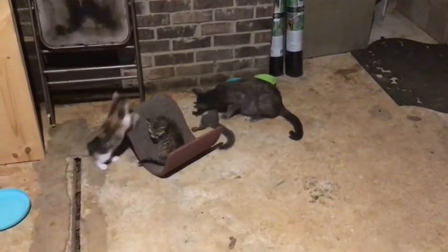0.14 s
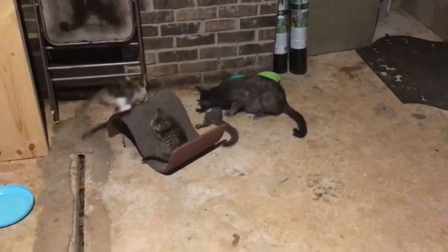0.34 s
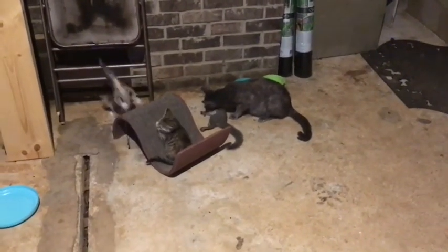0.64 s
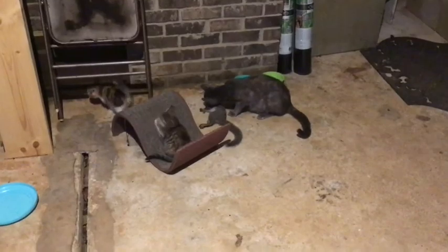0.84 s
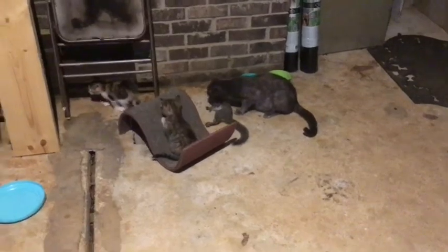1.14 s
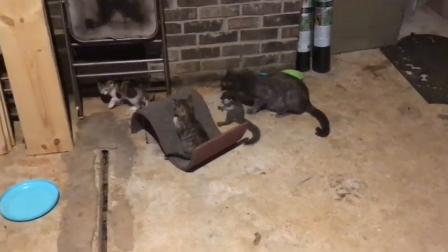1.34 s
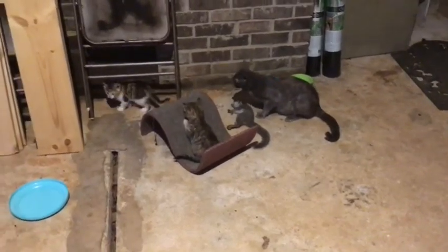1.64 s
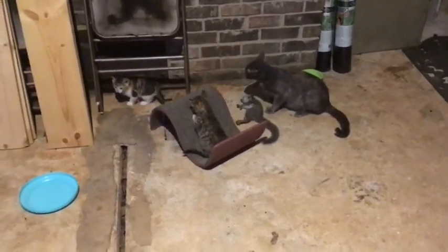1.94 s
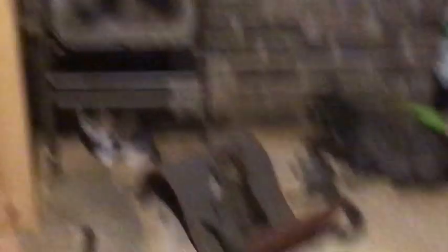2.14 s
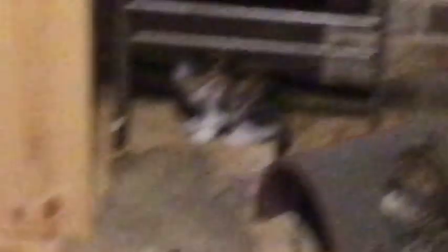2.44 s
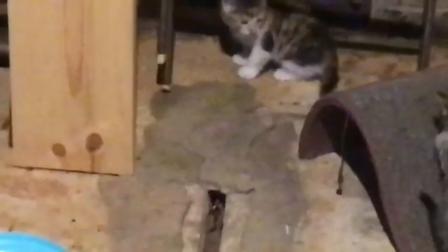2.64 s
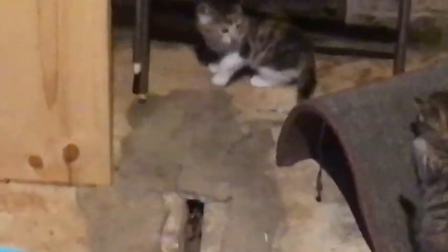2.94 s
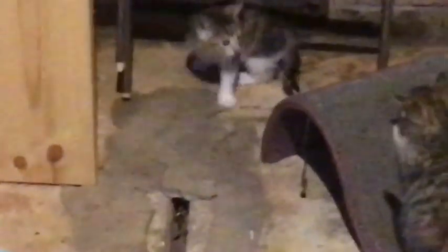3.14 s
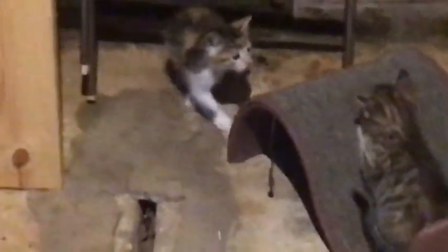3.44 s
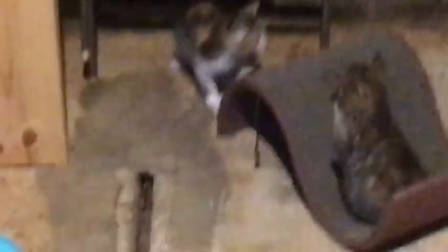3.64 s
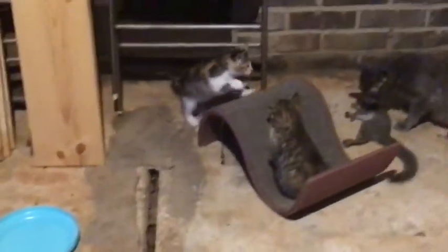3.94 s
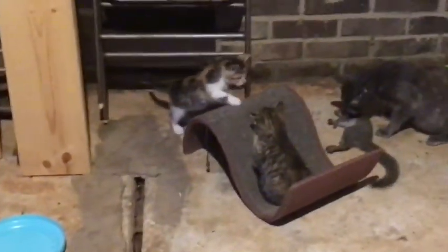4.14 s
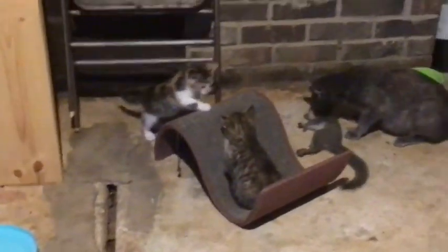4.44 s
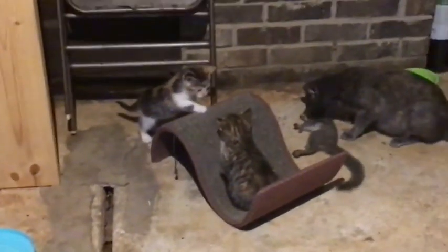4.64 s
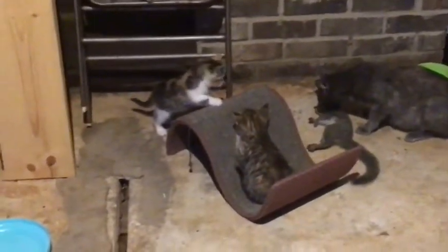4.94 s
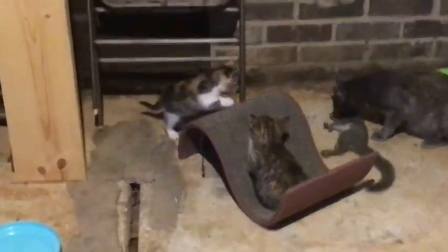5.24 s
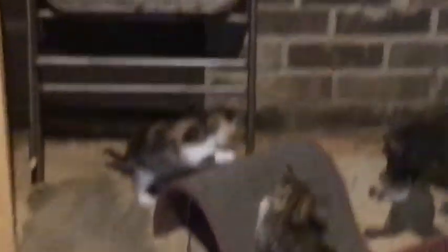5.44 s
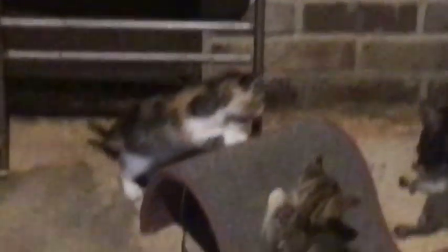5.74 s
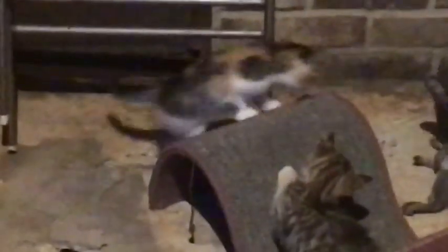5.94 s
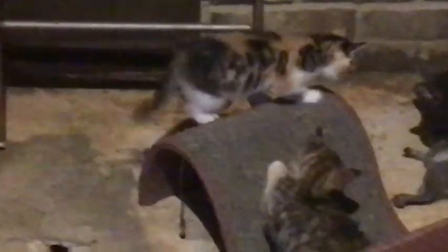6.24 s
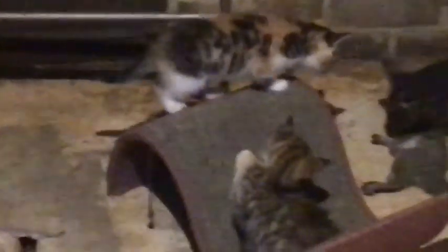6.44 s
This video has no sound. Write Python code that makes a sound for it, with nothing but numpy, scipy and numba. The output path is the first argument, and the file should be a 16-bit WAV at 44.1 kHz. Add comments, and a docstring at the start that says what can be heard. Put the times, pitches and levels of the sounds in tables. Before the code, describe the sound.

Faint kitten scuffles under a dense cricket chorus. At first the insects are distant and thin lens ticks flicker above uneven hand rumble. A deep double thump and rough finger rub dominate near two seconds. The chorus then swells and becomes more tonal, joined by single insect trills, small clicks and dry claw scratches. A duller handling knock follows around three and a half seconds, and lighter taps and scuffs close it.

```python
"""A porch at night: many crickets hiss together, louder while the phone's pickup narrows on two kittens.
Around the scratcher, claw scuffs, clicks and soft low taps are short noise bursts, some narrow and pitched.
Fingers tap and drag on the phone, the hand rumbles and creaks, the lens motor ticks: pushes, noise, pulses.
Air and a patchy rustle are coloured noise; small chirps are gliding tones, trills are narrow pulsing noise."""
import sys
import numpy as np
from scipy import signal
from scipy.fft import rfft, irfft, next_fast_len
from scipy.io import wavfile
from scipy.ndimage import uniform_filter1d
from numba import njit

SR = 44100
rng = np.random.default_rng(int(sys.argv[2]) if len(sys.argv) > 2 else 0)


def store_wav(level_fs):
    """Save 16-bit WAV to argv[1]."""
    pcm = np.round(np.clip(np.atleast_2d(level_fs), -1, 1) * 32767)
    wavfile.write(sys.argv[1], SR, pcm.T.astype(np.int16))


N = 290619  # length in samples


def undb(db):
    """Gain of a level in dB."""
    return 10 ** (np.asarray(db) / 20)


def curve(rows):
    """Columns of a time table joined by straight lines, one value a sample."""
    s, *columns = np.transpose(rows)
    return [np.interp(np.arange(N) / SR, s, column) for column in columns]


def shaped(x, points):
    """Colour x by a table of (f/Hz, level/dB) points, then set its rms to 1."""
    hz, db = np.transpose(points)
    size = next_fast_len(len(x))
    f = np.fft.rfftfreq(size, 1 / SR) + 1e-3  # keeps the logarithm finite at 0 Hz
    gain = undb(np.interp(np.log(f), np.log(hz), db, left=-90, right=-90))
    y = irfft(rfft(x, size) * gain, size)[:len(x)]
    return y / np.std(y)


@njit
def svf(x, hz, width):
    """State-variable band-pass with a moving centre, gain 1 at the centre."""
    y, band, low = np.empty(len(x)), 0., 0.
    for i in range(len(x)):
        g, k = np.tan(np.pi * hz[i] / SR), width / hz[i]
        v = (band + g * (x[i] - low)) / (1 + g * (g + k))
        band, low, y[i] = 2 * v - band, low + 2 * g * v, k * v
    return y


def narrow(x, hz, width):
    """A resonance applied twice, rms 1; its centre may move."""
    centre = hz * np.ones(len(x))
    # each pass is wider, so that the two together come close to width
    once = svf(x, centre, 1.5 * width)
    y = svf(once, centre, 1.5 * width)
    return y / np.std(y)


def walk(rate):
    """Random levels held 1 / rate s and smoothed twice; spread 1."""
    hold = int(SR / rate)
    steps = np.repeat(rng.standard_normal(N // hold + 1), hold)
    w = uniform_filter1d(uniform_filter1d(steps, hold), hold)[:N]
    return w / np.std(w)


def grainy(db, rate):
    """Noise whose level flickers by db, rate times a second."""
    return rng.standard_normal(N) * undb(db * walk(rate))


def add(out, s, x):
    """Mix x into out from time s."""
    i = int(s * SR)
    out[i:i + len(x)] += x[:N - i]


# colour of the quiet air: (f/Hz, relative level/dB per Hz)
AIR_COLOUR = [(500, -38.5), (800, -8), (1300, -8), (2400, -5), (5000, -14.5), (6600, -13), (7900, -17),
              (9800, -14.5), (11500, -22.5), (15900, -20.5)]


def quiet_air(level_db=-71):
    """A faint, nearly steady hiss of coloured noise."""
    return shaped(grainy(0.29, 34), AIR_COLOUR) * undb(level_db)


# cricket chorus over time: (t/s, level/dB, centre of its strongest part f/Hz)
CHORUS_PATH = [(0, -67.5, 3900), (1.95, -68, 3930), (2.25, -61.5, 3200), (2.6, -59.5, 4020),
               (3.0, -59, 4750), (3.5, -58, 4420), (5.0, -56.5, 4180), (5.45, -62, 4180), (6.59, -62, 4220)]
# colour of the whole chorus: (f/Hz, relative level/dB per Hz)
CHORUS_COLOUR = [(2500, -12.5), (3050, -2.5), (3400, 2), (4800, 1.5), (5100, -3.5), (5350, -14),
                 (6000, -45)]


def crickets():
    """So many singers that their pulses merge into a hiss; the narrowed pickup lifts its strongest part."""
    db, hz = curve(CHORUS_PATH)
    wide = shaped(grainy(1.73, 40), CHORUS_COLOUR)
    focus = np.clip((db + 71) / 8, 0, 1)  # the louder the chorus, the narrower the pickup
    focused = 0.28 * wide + 1.485 * svf(wide, hz, 844.0)
    chorus = (1 - focus) * wide + focus * focused
    # a few nearer singers stand out for a moment each
    for near_hz in np.linspace(3700, 4850, num=5):
        chorus = chorus + undb(-19) * narrow(grainy(5.0, 14), near_hz, 120)
    return chorus * undb(db + .6 * walk(5))


# grip on the phone: (t/s, rumble level/dB, level/dB of the creak of skin on the case)
GRIP_PATH = [(0, -60, -67.5), (.75, -61.5, -70.5), (1.3, -61.5, -70.5), (1.9, -52.5, -67),
             (2.4, -61.5, -67), (2.7, -60.5, -69.5), (3.5, -55.5, -67.5), (3.95, -67.5, -72.5),
             (5.05, -60, -67.5), (5.5, -55.5, -65.5), (5.75, -55, -70.5), (6.1, -57.5, -68.5),
             (6.59, -59, -73)]
# the hand shifts its hold: (t/s of the peak, rumble level/dB, half length t/s)
HOLD_SHIFTS = [(.92, -59, 0.11), (1.109, -58, 0.053), (1.42, -55, 0.062), (1.674, -61, 0.074),
               (2.854, -51, 0.13), (3.278, -64, 0.025), (4.303, -74.5, 0.47), (5.198, -53.5, 0.023),
               (5.458, -49.5, 0.014), (6.3, -52.5, 0.047)]
# colour of the low rumble, also used for the thud of a drag: (f/Hz, relative level/dB per Hz)
RUMBLE_COLOUR = [(28, -61), (45, -9), (65, 4.5), (140, -0.5), (250, -10.5), (400, -31)]


def hand():
    """The grip shakes the case in uneven low swells; skin creaks above them."""
    t = np.arange(N) / SR
    rumble_gain, creak_gain = undb(curve(GRIP_PATH))
    for s, db, half in HOLD_SHIFTS:
        rumble_gain = rumble_gain + undb(db) * np.clip(1 - ((t - s) / half) ** 2, 0, 1)
    rumble = shaped(grainy(3.6, 17), RUMBLE_COLOUR)
    creak = shaped(grainy(3.45, 60), [(180, -7.0), (300, -1.0), (650, -5.0), (900, -17.0), (1400, -38)])
    return rumble * rumble_gain + creak * creak_gain


# airy rustle, perhaps fur on carpet; the first level also holds before its time: (t/s, level/dB)
RUSTLE_PATH = [(2.36, -80), (2.48, -71), (2.6, -80), (2.74, -78.5), (2.78, -66.5), (2.95, -74), (3.04, -89),
               (3.08, -69), (3.25, -77), (3.33, -93.5), (4.5, -101), (4.58, -76), (4.68, -78), (4.78, -73),
               (4.9, -68), (5.0, -92), (5.1, -99)]


def rustle(centre_hz=5880, width_hz=1500):
    """A patchy high rustle: flickering noise through two resonances whose centre wanders."""
    hz = centre_hz * (1 + .05 * walk(12))
    once = svf(grainy(4.5, 50), hz, 1. * width_hz)
    x = svf(once, hz, 1. * width_hz)
    return x / np.std(x) * undb(curve(RUSTLE_PATH)[0])


# how likely each tick is, repeated in this order: one column, chance from 0 to 1 [no unit]
STEP_CHANCE = [.6, .1, 1, .1, 1, .9]


def lens(rate=60, start_s=.0137, zoom_s=2.0, before_db=-50, zoomed_db=-67):
    """Motor steps make thin ticks on the picture clock; some pictures need no step."""
    count = int(N / SR * rate) - 1
    luck = rng.random((count, 3))
    jitter = 0.0015 * (luck[:, 0] - .5)
    s = start_s + np.arange(count) / rate + jitter
    happens = luck[:, 1] < np.resize(STEP_CHANCE, count)
    steps = np.zeros(N)
    steps[(s * SR).astype(int)] = happens * undb(2.0 * luck[:, 2])
    tick = svf(steps, np.full(N, 9600.), 2200.) + .8 * svf(steps, np.full(N, 13500.), 4000.)
    level_db = np.where(np.arange(N) < zoom_s * SR, before_db, zoomed_db)
    return tick / np.max(np.abs(tick)) * undb(level_db)


# claw scuffs, clicks and a few soft low taps: (t/s, level/dB, centre f/Hz, time to fall by 60 dB t/s)
SHORT_BURSTS = [(0.094, -59, 1000, 0.24), (0.249, -55.5, 328, 0.32), (0.409, -55, 474, 0.38),
                (1.01, -62.5, 935, 0.42), (2.218, -49.5, 2420, 0.062), (2.324, -58, 8900, 0.018),
                (2.334, -61, 8340, 0.086), (2.346, -52, 298, 0.11), (2.427, -49.5, 418, 0.09),
                (3.497, -48.5, 487, 0.14), (3.264, -63, 7000, 0.045), (3.402, -55.5, 6600, 0.33),
                (4.65, -55.5, 2550, 0.55), (4.798, -55.5, 5460, 0.23), (5.051, -60.5, 1090, 0.28),
                (5.1, -59.5, 2300, 0.59), (5.29, -60, 7240, 0.043), (5.311, -57, 6860, 0.059),
                (5.352, -52.5, 9100, 0.03), (5.483, -61, 9700, 0.1), (5.965, -53.5, 5800, 0.28),
                (5.97, -56, 12500, 0.29), (6.41, -67, 9000, 0.14)]
# narrow pitched scuffs, the low ones near 5.8 s perhaps a faint kitten trill: (t/s, level/dB, centre f/Hz)
NARROW_SCUFFS = [(4.648, -54, 2270), (4.805, -54.5, 2200), (4.882, -56, 3000), (5.19, -60, 1830),
                 (5.802, -57, 780), (5.814, -55.5, 1200), (5.858, -57.5, 920)]


def scuffs(attack_share=0.017):
    """Short noise bursts, wide or narrow and pitched, start quickly and die away in the porch."""
    out, grain = np.zeros(N), grainy(2.5, 70)
    slide = 1 + .025 * walk(30)  # the pitch wavers
    # widths are shares of the centre frequency
    wide = [(s, db, hz, 0.83 * hz, t60) for s, db, hz, t60 in SHORT_BURSTS]
    pitched = [(s, db, hz, 0.15 * hz, 0.33) for s, db, hz in NARROW_SCUFFS]
    for s, db, hz, width, t60 in wide + pitched:
        part = slice(int(s * SR), int((s + t60) * SR))
        x = narrow(grain[part], hz * slide[part], width)
        t = np.arange(len(x)) / SR
        attack = 1 - np.exp(-t / (attack_share * t60))
        decay = undb(-60 * t / t60)
        add(out, s, undb(db) * x * attack * decay)
    return out


# finger taps on the phone, some sharp, some deep and dull:
# (t/s, click peak level/dB, thud peak level/dB, thud f/Hz)
FINGER_TAPS = [(0.409, -56, -48.5, 450), (1.089, -76, -49.5, 345), (1.513, -39, -36, 403),
               (1.909, -63, -45.5, 293), (1.984, -27.5, -29, 870), (1.988, -45, -6.5, 185),
               (2.057, -50, -12.5, 115), (2.498, -54.5, -47, 356), (2.543, -66, -55, 302),
               (2.805, -53, -60.5, 400), (2.826, -43, -45, 347), (2.762, -75, -32.5, 440),
               (2.907, -54, -25, 205), (3.597, -44, -28, 600), (5.289, -62.5, -64, 202),
               (5.354, -45, -36.5, 700), (5.381, -45, -34, 636), (5.425, -65, -47.5, 260),
               (6.01, -85, -49.5, 377), (6.149, -85, -45.5, 258)]


def taps(turns=1.75, click_hz=1800, case_hz=52, steepness=2.8, rattle_db=-12, rattle_t60_s=.08):
    """A short push heard through the case: the treble arrives first, each octave down twice as late."""
    out, size = np.zeros(N), 8192
    f = np.fft.rfftfreq(size, 1 / SR) + 1
    delay = np.exp(-2j * np.pi * turns * np.log(np.minimum(f / 3020.0, 1)))
    late = delay / (1 + (case_hz / f) ** 6)  # the case passes little below case_hz
    click = irfft(late * f / (f + 950.0) / (1 + (f / click_hz) ** 2) ** 2, size)
    click = click / np.max(np.abs(click))
    for s, click_db, thud_db, hz in FINGER_TAPS:
        # a fingertip is soft: little above the pitch of its contact
        thud = irfft(late * (f / hz) ** 0.96 / (1 + (f / hz) ** 2) ** steepness, size)
        thud = thud / np.max(np.abs(thud))
        add(out, s, undb(click_db) * click + undb(thud_db) * thud)
    # rough tail of the case after each push
    t = np.arange(size) / SR
    rattle = rng.standard_normal(size) * undb(-60 * t / rattle_t60_s)
    tail = signal.fftconvolve(out, rattle / np.linalg.norm(rattle))[:N]
    return out + undb(rattle_db) * tail


# a finger drags over the case: (t/s, hold t/s, rub level/dB, thud level/dB,
# rub rise/dB per s, rub fall/dB per s, treble gain/dB)
FINGER_DRAGS = [(2.042, 0.011, -32.5, -26.5, 496, 256, -1.5), (2.103, 0.023, -30.5, -37.5, 301.5, 207, -10),
                (3.594, .024, -37.5, -44, 650, 1000, -2), (5.297, 0.0053, -62.5, -44, 297, 400, -6),
                (5.357, 0.013, -54.5, -45.5, 300, 309, 0.1)]
# colour of the rough middle: (f/Hz, relative level/dB per Hz)
RUB_COLOUR = [(150, -43), (220, -7.5), (540, -3), (800, -12), (1300, -28.5), (2000, -51)]
# colour of the hiss before the treble gain: (f/Hz, relative level/dB per Hz)
HISS_COLOUR = [(600, -30), (900, 0.5), (1900, 1), (3640, -2), (4900, -8), (7100, -17.5), (8390, -13),
               (11300, -21.5), (15900, -27)]


def drags(hiss_at_db=-39.5, hiss_follows=0.51, thud_lingers=0.62):
    """Skin sticks and slips: lumpy lows, a rough middle, a dense hiss on top."""
    thud = shaped(grainy(2.0, 40), RUMBLE_COLOUR)
    rub = shaped(grainy(2.2, 120), RUB_COLOUR)
    hiss = shaped(grainy(1.2, 90), HISS_COLOUR)
    treble = svf(hiss, np.full(N, 9500.), 10000.)
    out, t = 0, np.arange(N) / SR
    for s, hold, rub_db, thud_db, rise, fall, treble_db in FINGER_DRAGS:
        ease_db = -np.maximum(0, np.maximum(rise * (s - t), fall * (t - s - hold)))
        # hiss_at_db belongs to a rub of -31 dB; a louder rub hisses louder
        hiss_db = hiss_at_db + hiss_follows * (rub_db + 31.0)
        bright_hiss = hiss + (undb(treble_db) - 1) * treble
        skin = rub * undb(rub_db) + bright_hiss * undb(hiss_db)
        # the thud swells and fades more gently than the skin
        out = out + thud * undb(thud_db + thud_lingers * ease_db) + skin * undb(ease_db)
    return out


# single insects: (start t/s, end t/s, centre f/Hz, width f/Hz, level/dB)
SINGLE_INSECTS = [(2.96, 3.22, 2400, 200, -73), (3.64, 4.18, 2340, 170, -70.5),
                  (5.98, 6.7, 2370, 230, -66.5), (6.0, 6.45, 1170, 150, -80), (2.8, 6.7, 1860, 120, -78),
                  (3.69, 4.24, 6520, 150, -78)]


def trills(rate=40):
    """Each singer scrapes a narrow resonance in uneven pulses."""
    out, t = 0, np.arange(N) / SR
    pulse_hz = rate * (1 + .2 * walk(6))
    pulse = 1 + .25 * np.sin(2 * np.pi * np.cumsum(pulse_hz) / SR)
    for start, end, hz, width, db in SINGLE_INSECTS:
        gate = np.clip((t - start) / 0.0035, 0, 1) * np.clip((end - t) / 0.077, 0, 1)
        song = narrow(grainy(2.5, 14) * pulse, hz * (1 + .007 * walk(10)), width)
        out = out + undb(db) * gate * song
    return out


# short gliding chirps: (t/s, length t/s, start f/Hz, end f/Hz, level/dB before swell and roughness)
GLIDING_CHIRPS = [(2.931, 0.067, 4260, 4890, -54), (3.1, 0.023, 6800, 5400, -70),
                  (3.212, 0.065, 4280, 4790, -53), (3.34, 0.068, 6600, 6950, -75),
                  (3.701, 0.015, 6400, 6400, -64), (5.246, 0.059, 6050, 6500, -68),
                  (5.736, 0.032, 6900, 5470, -73)]


def chirps():
    """Rough, broken whistles: sine tones that glide in pitch."""
    out, rough = np.zeros(N), undb(2.5 * walk(150))
    waver = 1 + .009 * walk(300)
    for s, length, start_hz, end_hz, db in GLIDING_CHIRPS:
        u = np.linspace(0, 1, int(length * SR))  # progress through the chirp
        hz = (start_hz + (end_hz - start_hz) * u) * waver[int(s * SR):][:len(u)]
        swell = np.sin(np.pi * u) ** .5
        whistle = np.sin(2 * np.pi * np.cumsum(hz) / SR)
        add(out, s, np.sqrt(2) * undb(db) * swell * whistle)
    return out * rough


def scene():
    """Everything at the one microphone."""
    background = quiet_air() + crickets() + hand() + rustle() + lens()
    events = scuffs() + taps() + drags() + trills() + chirps()
    return (background + events)[None]


def record(dry):
    """The phone cuts the top above 15650 Hz with a steep low-pass."""
    return signal.sosfilt(signal.ellip(10, .2, 80, 15650, fs=SR, output="sos"), dry)


dry = scene()
out = record(dry)
store_wav(out)
```